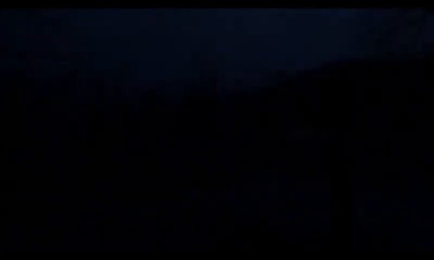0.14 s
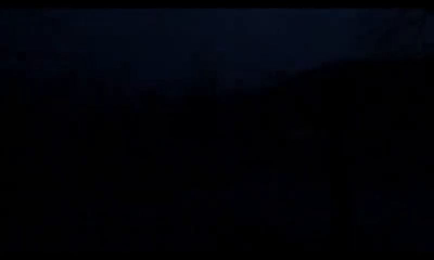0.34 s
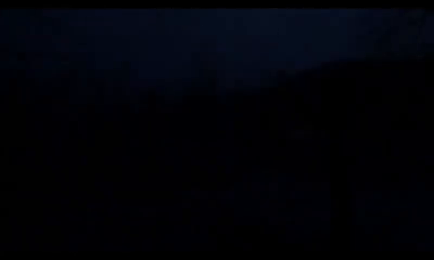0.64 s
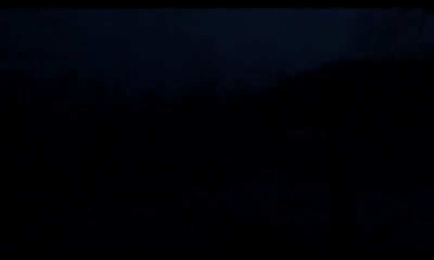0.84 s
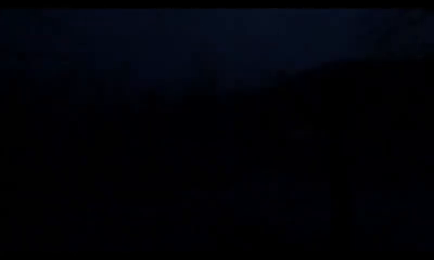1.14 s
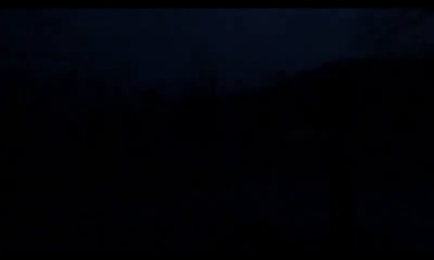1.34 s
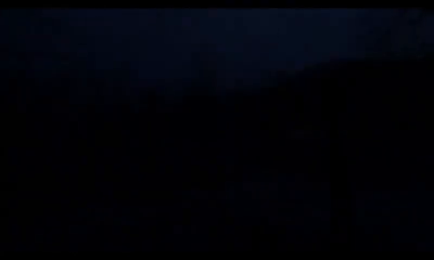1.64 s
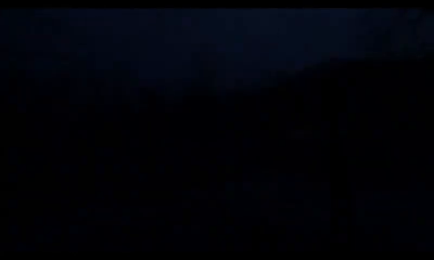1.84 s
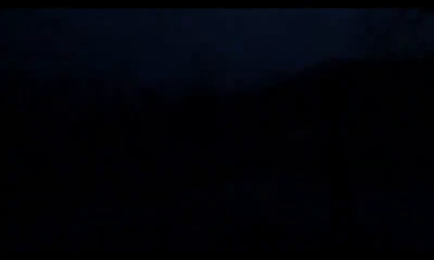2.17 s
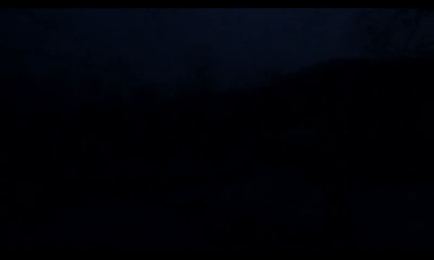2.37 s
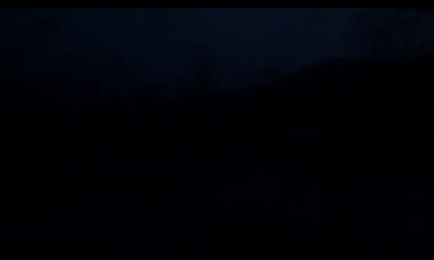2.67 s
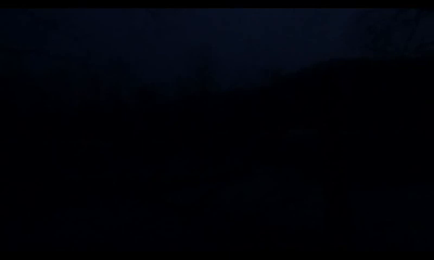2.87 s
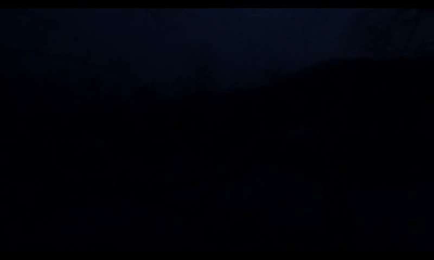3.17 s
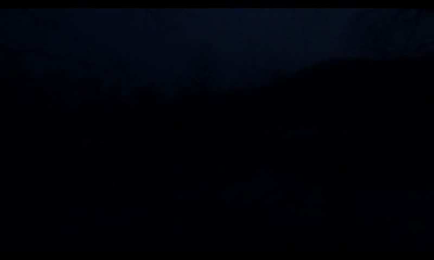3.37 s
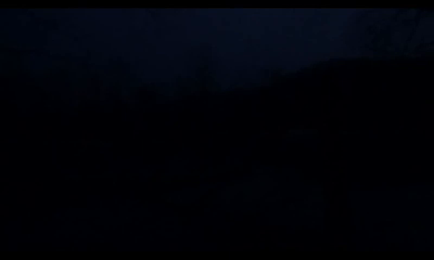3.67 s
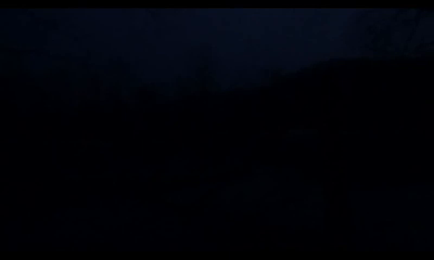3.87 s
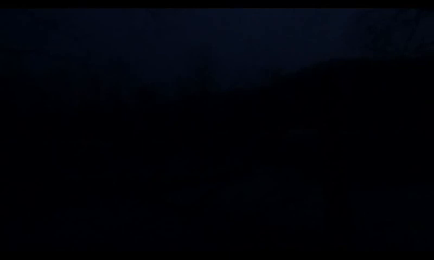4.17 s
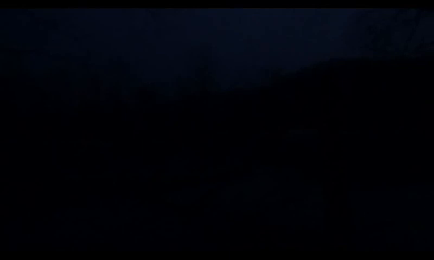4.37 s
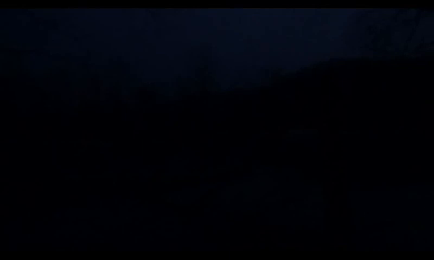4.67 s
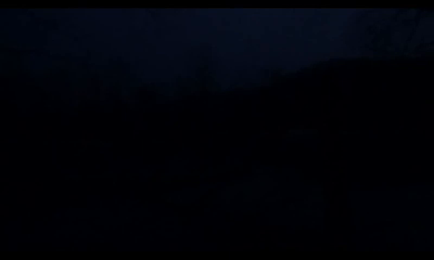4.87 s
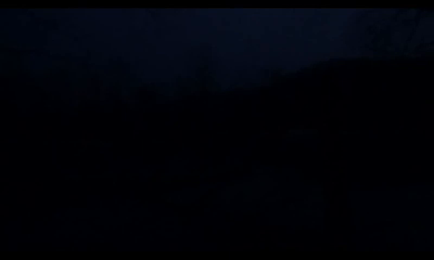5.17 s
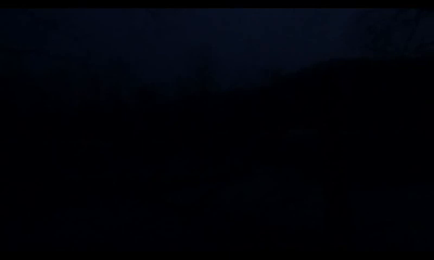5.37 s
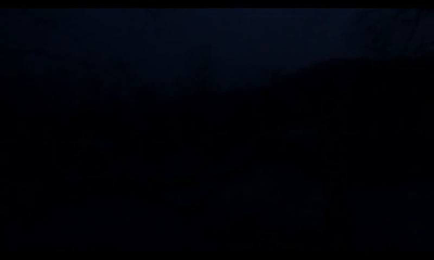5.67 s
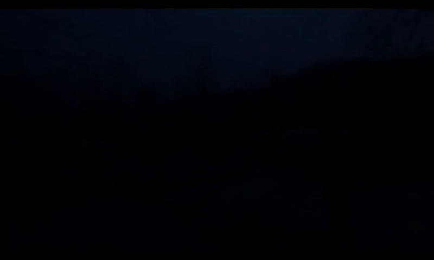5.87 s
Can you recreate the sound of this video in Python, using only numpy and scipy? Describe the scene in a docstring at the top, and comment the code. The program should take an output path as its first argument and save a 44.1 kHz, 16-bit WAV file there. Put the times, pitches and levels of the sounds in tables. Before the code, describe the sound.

In woods at dusk, an owl calls twice, close to the microphone and a little left. Each call is a rhythmic series of round, slightly breathy hoots, the second ending in a drawn-out falling note. A soft, steady stream dips beneath the hoots and comes back up afterward, while bubbles plop and twigs and dry leaves crackle faintly.

```python
"""Dusk woods: a steady stream rushes, a twig ticks. Close on the left comes an owl-like hoo, hoo, hoo-hoo,
the flute-like tone of a blown cavity: harder blowing lifts its pitch, overtones and air hiss together.
The trees return a faint tail. At 2.3 s the call comes again, and its last hoot slides away by 4 s.
The background level, sunk under the hoots, then recovers, like a recorder's gain control,
while single bubbles plop and twigs and dry leaves crackle."""
import sys
import numpy as np
from scipy import signal
from scipy.fft import rfft, irfft, next_fast_len
from scipy.io import wavfile
from scipy.ndimage import uniform_filter1d

SR = 44100
rng = np.random.default_rng(int(sys.argv[2]) if len(sys.argv) > 2 else 0)


def store_pcm(level_fs):
    """Save levels as 16-bit WAV."""
    pcm = np.round(np.clip(level_fs, -1, 1) * 32767).astype(np.int16)
    wavfile.write(sys.argv[1], SR, np.atleast_2d(pcm).T)


N = 265482
TIME = np.arange(N) / SR

# one push of air per hoot, slurred where they overlap: start_s, crest_s, end_s, crest_pitch_hz
PUSHES = [(.454, 0.554, .63, 609.4), (0.837, 0.91, 1.004, 632.6), (1.301, 1.375, 1.486, 611.6),
          (1.422, 1.579, 1.673, 640), (2.344, 2.435, 2.535, 630.8), (2.722, 2.785, 2.911, 651.2),
          (3.186, 3.259, 3.368, 629)]
# the long last hoot, sliding away as the air runs out: time_s, pitch_hz, level_db
LAST_HOOT = [(3.34, 570, -10), (3.39, 638.3, -10), (3.45, 654.2, -9.5), (3.512, 637.3, -9.5),
             (3.6, 611.9, -13), (3.692, 588, -11), (3.752, 568.1, -13), (3.848, 525.5, -19.5),
             (3.896, 464, -30), (3.916, 433, -41), (3.97, 364.5, -45.5), (4.03, 294.3, -59.5)]
# overtone colour at the reference blow: frequency_hz, relative_level_db
OVERTONES = [(900, -12), (1150, -39.5), (1240, -27.5), (1330, -36.5), (1650, -35.5), (1860, -26),
             (1990, -41.5), (2200, -42), (2500, -37), (2750, -44.5), (2900, -40), (3100, -45.5),
             (3400, -58), (3850, -40.5), (4180, -60.5), (4280, -40), (4400, -57.5), (5800, -47.5)]
# brief splits of the tone: centre_s, half_length_s, pitch_hz, relative_level_db, difference_db, sum_db
SPLITS = [(1.456, .028, 710.6, -19, -17.5, -27), (3.509, .035, 821, -33.5, -23, -2.5)]
# colour of the air hiss: frequency_hz, relative_level_db
HISS_COLOUR = [(30, -12), (140, -11.5), (300, -1.5), (520, 5.5), (780, 12.5), (1080, -7.5), (1600, 2.5),
               (2800, -6), (3500, -8), (5800, -8.5), (7500, -17.5), (8600, -7.5), (9900, -12), (11000, -23)]
# how alike the hiss is at both ears: frequency_hz, likeness (-1 to 1)
HISS_LIKENESS = [(60, 0.032), (600, 0.94), (1200, 0.81), (2300, 0.45), (5500, 0.14), (9000, .85)]
# upper resonances of the cavity: centre_hz, width_hz, relative_level_db
CAVITY_RINGS = [(1565, 84, -47.5), (2890, 180, -50.5), (4290, 11, -60.5), (5800, 260, -67),
                (8600, 300, -65)]
# where the hoot sits in stereo: frequency_hz, left_minus_right_db, left_lead_rad
HOOT_SIDE = [(100, -2.5, 0), (342.5, 6, 0), (624, 10.5, 0.22), (1250, 15.5, -1.15), (1711, 27.5, 4.3),
             (1874, 11, -2), (2340, 7.5, 2), (2455, 7, 1.45), (3020, 9, -1.9), (4240, 4.5, -2.5),
             (6500, -1.5, -1), (10810, -2.5, -1)]
# soft high notes leading into hoots and trailing the last: start_s, length_s, from_hz, to_hz, level_db
SOFT_NOTES = [(.373, .05, 576, 695, -21.5), (.806, 0.032, 545, 729, -26), (1.274, 0.028, 540, 750, -27),
              (2.288, 0.057, 550, 696, -27), (2.698, .031, 573, 733, -28.5),
              (3.142, 0.046, 562, 748, -28.5), (3.93, 0.095, 720, 601.5, -40.5),
              (4.01, 0.12, 615.5, 560, -26.5), (4.11, .05, 567.4, 494, -40),
              (4.16, 0.033, 585, 558.5, -44.5)]
# low murmurs under too little air: start_s, length_s, from_hz, to_hz, level_db
MURMURS = [(.402, .04, 338, 433, -36), (.428, 0.044, 415, 483.5, -25.5), (.626, 0.02, 424, 294, -45),
           (1.18, .09, 247, 225, -56)]
# slaps off near trunks: delay_s, level_db, left_minus_right_db
TRUNK_ECHOES = [(.021, -26, 6.5), (.058, -32, 9), (.094, -38.5, 1.5)]
# background level sinks under the hoots and recovers after them, like a recorder's gain control:
# time_s, level_db, tilt_db_per_octave
BACKGROUND_GAIN = [(0, -46, 1.5), (.35, -46, 0), (.75, -49, -1), (1.9, -56, 1), (2.349, -51.5, 0.5),
                   (3.051, -55, -.5), (4.402, -54.5, 0.3), (5.5, -50.5, 0.8), (6.02, -49.5, 0)]
# colour of the rushing water: frequency_hz, relative_level_db
STREAM_COLOUR = [(25, -7.5), (62, -9.5), (110, -11.5), (260, -9.5), (360, -8.5), (460, -0.5), (950, -0.5),
                 (1270, 0), (1800, -2.5), (2050, -6.5), (3000, -6), (5500, -12.5), (7200, -22), (8800, -9),
                 (11000, -20.5)]
# how alike the rush is at both ears: frequency_hz, likeness (-1 to 1)
STREAM_LIKENESS = [(60, 0.8), (170, 1), (490, 0.91), (1410, 0.82), (4060, 0.79), (11600, 0.51)]
# single plops in the stream: start_s, peak_db, pitch_hz
PLOPS = [(4.748, -44, 1690), (4.886, -44, 1380), (4.965, -46.5, 623), (5.022, -45.5, 610),
         (5.212, -44.5, 634), (5.241, -37.5, 1720)]
# dry ticks and a soft knock of twigs: start_s, relative_peak_db, centre_hz, t60_s
TWIG_TICKS = [(.061, -29.5, 496, 0.013), (0.364, -23, 2200, 0.0056), (0.456, -24.5, 1290, 0.034),
              (0.705, -33.5, 2700, 0.016), (1.206, -33, 1500, 0.048), (1.931, -41, 2000, 0.017),
              (2.066, -51, 6100, .02), (2.077, -32, 9650, 0.0054), (2.292, -35, 7100, 0.0081),
              (3.185, -43, 2974, .007), (4.146, -35, 8140, 0.0083), (4.245, -42, 2005, 0.017),
              (4.35, -41.5, 813, 0.045), (4.366, -46, 7150, 0.011), (4.811, -34, 9600, 0.009),
              (5.279, -34, 6200, 0.0098), (5.33, -38, 1300, 0.033), (5.692, -32.5, 1210, 0.05)]
# crunches of dry leaves: centre_s, spread_s, level_db, centre_hz
LEAF_CRUNCHES = [(3.853, 0.0091, -45, 1350), (4.264, 0.011, -49, 1304), (4.704, 0.015, -47.5, 1100),
                 (4.771, 0.016, -54, 1627), (5.161, 0.0086, -48.5, 1520), (5.183, 0.02, -55, 1245),
                 (5.705, 0.013, -47, 1100), (5.97, 0.0071, -55, 1200)]


def hoots(reference_hz=630, tone_side_db=9.5, purity=0.33):
    """A blown cavity's nearly pure tone; pitch follows the pressure, which drives overtones and hiss."""
    hz, level = blowing()
    blow_hz = np.minimum(hz - reference_hz, 40)
    phase = trembling_phase(hz, jitter=0.0045)
    left_only = np.array([[1], [0]])
    tone = np.sin(phase + left_only * at_hz(HOOT_SIDE, reference_hz, column=2))
    tone = tone * from_db(.18 * drift(35)) * sag(hz)   # the held tone wavers very slightly
    overtones = 0
    for k in range(2, 10):
        growth_db = 0.0136 * (k - 2.5) * blow_hz   # higher overtones grow faster with pressure
        strength = from_db(at_hz(OVERTONES, k * hz) + growth_db - 0.76 * drift(28))
        partial = np.sin(k * phase + left_only * at_hz(HOOT_SIDE, k * hz, column=2))
        overtones += strength * partial * pan(at_hz(HOOT_SIDE, k * hz))
    overtones *= (np.abs(level) / level.max()) ** purity   # a fading hoot turns pure
    voice = np.sqrt(2) * ((tone + split_tones(phase)) * pan(tone_side_db) + scattered(overtones))
    return level * (voice + air_hiss(phase, blow_hz) + cavity_rings(blow_hz))


def blowing(start_hz=485.3, end_hz=533, held_db=-10, attack_share=0.25, release_s=0.022):
    """Pitch and amplitude of the hoots: each push of air arches in pitch, and the strongest leads."""
    times, slide_hz, slide_db = np.transpose(LAST_HOOT)
    begun = TIME >= times[0]
    hz = uniform_filter1d(np.interp(TIME, times, slide_hz), int(.021 * SR)) * begun
    level = from_db(np.interp(TIME, times, slide_db)) * begun * (TIME <= times[-1])
    for start, crest, end, crest_hz in PUSHES:
        to_crest = np.maximum(crest - TIME, 0) / (crest - start)
        past_crest = np.maximum(TIME - crest, 0) / (end - crest)
        arch = crest_hz - (crest_hz - start_hz) * to_crest ** 2.15
        arch -= (crest_hz - end_hz) * past_crest ** 1.95
        droop_hz = 44.92 * np.exp(np.clip((TIME - end) / .007, -20, 2))   # the push runs out
        hz = np.maximum(hz, arch - droop_hz)
        opening = soft_step((1 - to_crest) / attack_share) * soft_step((end - TIME) / release_s)
        level = np.maximum(level, from_db(held_db) * opening)
    return uniform_filter1d([np.maximum(hz, slide_hz.min()), level], int(.003 * SR), axis=1)


def sag(hz, centre_hz=613, width_hz=7.9, depth_db=-3.5, fall_hz_per_s=700):
    """The level dips briefly as the pitch falls quickly through one narrow zone."""
    falling = np.clip(-np.gradient(hz) * SR / fall_hz_per_s, 0, 1)
    return from_db(depth_db * falling * np.exp(-np.square((hz - centre_hz) / width_hz)))


def split_tones(phase):
    """A second oscillation mixes with the main one into difference and sum tones."""
    out = 0
    for centre, half_s, hz, db, difference_db, sum_db in SPLITS:
        second = 2 * np.pi * hz * TIME
        difference = from_db(difference_db) * np.sin(second - phase)
        sums = from_db(sum_db) * sum(np.sin(second + k * phase) / k for k in range(1, 4))
        swell = np.exp(-((TIME - centre) / half_s) ** 4)
        out += from_db(db) * swell * (np.sin(second) + difference + sums)
    return out


def air_hiss(phase, blow_hz, level_db=-30, growth_db_per_hz=0.1064):
    """The breathy jet puffs once a cycle and grows with pressure."""
    bands = noise_bands(HISS_COLOUR, HISS_LIKENESS, flicker_db=2.35)
    hiss = sum(band * pan(at_hz(HOOT_SIDE, hz)) for hz, band in bands)
    return hiss * (1 + 0.17 * np.sin(phase)) * from_db(level_db + growth_db_per_hz * blow_hz)


def cavity_rings(blow_hz, gain_db=9, growth_db_per_hz=0.1449):
    """Air noise rings the cavity's upper resonances, louder under harder blowing."""
    out = 0
    for hz, width, db in CAVITY_RINGS:
        ring = resonance(resonance(rng.standard_normal(N), hz, width), hz, 4 * width)
        out += from_db(db) * rms_one(ring) * pan(at_hz(HOOT_SIDE, hz))
    return out * from_db(gain_db + growth_db_per_hz * blow_hz)


def soft_tones(notes, roundness, lead_db, lead_s, jitter, side_db):
    """At low pressure the cavity sings unsteady sines that creep in, then swell and fade on a glide."""
    out = 0
    for start, length, from_hz, to_hz, db in notes:
        along = np.clip((TIME - start) / length, 0, 1)
        swell = (4 * along * (1 - along)) ** roundness
        creep = from_db(lead_db) * np.exp(-np.clip((start - TIME) / lead_s, 0, 20)) * (1 - along)
        phase = trembling_phase(from_hz + (to_hz - from_hz) * along, jitter)
        out += from_db(db) * np.maximum(swell, creep) * np.sin(phase)
    return np.sqrt(2) * out * pan(side_db)


def scattered(x, wet_db=-8, decay_s=0.031):
    """Nearby surfaces add early reflections, so gliding overtones swell and fade."""
    age = TIME[:SR // 30]
    paths = rng.standard_normal((2, len(age))) * np.exp(-age / decay_s)
    paths /= np.linalg.norm(paths, axis=1, keepdims=True)
    return x + from_db(wet_db) * signal.fftconvolve(x, paths, axes=1)[:, :N]


def trunk_echoes(x):
    """The nearest trunks each throw the call back once."""
    mono = x.mean(axis=0)
    return sum(from_db(db) * pan(side_db) * np.interp(TIME - delay, TIME, mono, left=0)
               for delay, db, side_db in TRUNK_ECHOES)


def woods_tail(x, wet_db=-33, t60_s=1.3, lowpass_hz=1500, predelay_s=0.051):
    """Countless trunks scatter a faint, dull tail, different at each ear."""
    age = TIME[:2 * SR]
    echoes = rng.standard_normal((2, len(age))) * from_db(-60 * age / t60_s) * (age > predelay_s)
    echoes /= np.linalg.norm(echoes, axis=1, keepdims=True)
    dulled = signal.sosfilt(signal.butter(2, lowpass_hz, fs=SR, output="sos"), x.mean(axis=0))
    return from_db(wet_db) * signal.fftconvolve(dulled[None], echoes, axes=1)[:, :N]


def stream(rush_db=-1, gurgle_db=-8, spray_db=-12, pivot_hz=1500):
    """A steady bed of rushing water with gurgling bubbles and a fine crackle of spray."""
    times, db, tilt = np.transpose(BACKGROUND_GAIN)
    tilt = np.interp(TIME, times, tilt)
    bands = noise_bands(STREAM_COLOUR, STREAM_LIKENESS, flicker_db=2.5)
    rush = sum(band * from_db(tilt * np.log2(hz / pivot_hz)) for hz, band in bands)
    gurgle = bubbles(per_s=520, low_hz=590.4, high_hz=2352, sharpness=16, spread_db=3.5)
    spray = bubbles(per_s=430, low_hz=4860, high_hz=10600, sharpness=8.5, spread_db=5.5)
    water = from_db(rush_db) * rush + from_db(gurgle_db) * gurgle + from_db(spray_db) * spray
    return from_db(np.interp(TIME, times, db) + 1.2 * drift(12)) * water


def bubbles(per_s, low_hz, high_hz, sharpness, spread_db, pitches=22):
    """Bubbles of random size burst at random, each ringing a few cycles; rms 1."""
    out = 0
    for hz in np.geomspace(low_hz, high_hz, pitches):
        bursts = rng.random(N) < per_s / pitches / SR
        size = np.minimum(rng.exponential(1, N), 4)
        rings = resonance(bursts * from_db(spread_db * size), hz, hz / sharpness)
        out += rms_one(rings) * pan(rng.normal(0, 1.8))
    return rms_one(out)


def plops(ring_s=0.0093, rise_per_s=4.14):
    """Large bubbles ring briefly and rise in pitch as they surface."""
    out = 0
    for start, db, hz in PLOPS:
        age = np.clip(TIME - start, 0, 20 * ring_s)
        phase = 2 * np.pi * hz * age * (1 + rise_per_s * age / 2)
        out += from_db(db) * np.exp(-age / ring_s) * np.sin(phase)
    return out


def twig_ticks(trim_db=-1, sharpness=1.6):
    """Each twig gives a short burst of noise ringing in one broad resonance."""
    out, age = np.zeros(N), TIME[:SR // 4]
    for start, db, hz, t60 in TWIG_TICKS:
        burst = rng.standard_normal(len(age)) * from_db(-60 * age / t60)
        burst = resonance(resonance(burst, hz, hz / sharpness), hz, 3 * hz / sharpness)
        at = int(start * SR)
        out[at:at + len(age)] += (from_db(db + trim_db) * burst / np.abs(burst).max())[:N - at]
    return out


def leaf_crunches(snaps_per_s=550, sharpness=2.6):
    """Dry leaves crunch in clumps of tiny, uneven snaps."""
    out = 0
    for centre, spread_s, db, hz in LEAF_CRUNCHES:
        snaps = (rng.random(N) < snaps_per_s / SR) * rng.standard_normal(N)
        leaves = rms_one(resonance(resonance(snaps, hz, hz / sharpness), hz, hz))
        out += from_db(db) * np.exp(-np.square((TIME - centre) / spread_s) / 2) * leaves
    return out


def noise_bands(spectrum, likeness, flicker_db):
    """Coloured stereo noise of rms about 1, yielded as flickering half-octave bands: centre_hz, band."""
    edges = 28 * 2 ** (np.arange(19) / 2)
    size = next_fast_len(N)
    colour = from_db(at_hz(spectrum, np.maximum(np.fft.rfftfreq(size, 1 / SR), 1)))
    white = rng.standard_normal((2, 2, size))   # neighbouring bands use separate mid/side pairs
    noise = rms_one(irfft(rfft(white) * colour, size)[..., :N])
    for k, hz in enumerate(np.sqrt(edges[1:] * edges[:-1])):
        bandpass = signal.butter(2, edges[k:k + 2], "band", fs=SR, output="sos")
        mid, side = signal.sosfilt(bandpass, noise[k % 2])
        alike = np.clip(at_hz(likeness, hz), -.99, .99)
        band = np.sqrt((1 + alike) / 2) * mid + np.sqrt((1 - alike) / 2) * side * [[1], [-1]]
        yield hz, band * from_db(flicker_db * drift(30))


def trembling_phase(hz, jitter):
    """Phase of a tone whose pitch trembles in the turbulent air."""
    return 2 * np.pi * np.cumsum(hz * (1 + jitter * drift(98))) / SR


def drift(rate_hz, step=20, settle=4000):
    """Smooth random modulation of rms 1."""
    r = np.exp(-2 * np.pi * rate_hz * step / SR)
    slow = signal.lfilter([1], [1, -2 * r, r * r], rng.standard_normal(N // step + settle + 2))[settle:]
    return np.interp(np.arange(N) / step, np.arange(len(slow)), rms_one(slow))


def resonance(x, hz, width_hz):
    """Two-pole band-pass with unity gain at its peak."""
    r = np.exp(-np.pi * width_hz / SR)
    poles = [1, -2 * r * np.cos(2 * np.pi * hz / SR), r * r]
    return signal.lfilter(np.array([1, 0, -1]) * (1 - r * r) / 2, poles, x + 1e-18)


def soft_step(x, steepness=2.34):
    """An S-shaped fade from near 0 to near 1 as x goes from 0 to 1."""
    return (1 + np.tanh(steepness * (x - .5))) / 2


def pan(side_db):
    """Left and right gains whose mean is 1; positive leans left."""
    ratio = from_db(np.atleast_1d(side_db))
    return 2 * np.array([ratio, np.ones_like(ratio)]) / (1 + ratio)


def at_hz(points, hz, column=1):
    """Read a table on a log-frequency axis."""
    return np.interp(np.log(hz), np.log(np.array(points)[:, 0]), np.array(points)[:, column])


def from_db(db):
    """Decibels to gain."""
    return 10 ** (np.asarray(db) / 20)


def rms_one(x):
    """Scale to rms 1."""
    return x / np.sqrt(np.mean(x ** 2) + 1e-20)


def scene():
    """The call up front, its echoes behind it, then the water and the undergrowth."""
    soft = soft_tones(SOFT_NOTES, roundness=.9, lead_db=-14.5, lead_s=.021, jitter=.008, side_db=5)
    murmurs = soft_tones(MURMURS, roundness=.7, lead_db=-11.5, lead_s=.008, jitter=.029, side_db=2.5)
    call = hoots() + soft + murmurs
    return call + trunk_echoes(call) + woods_tail(call) + stream() + plops() + twig_ticks() + leaf_crunches()


def record(dry):
    """A steep high cut at 11 kHz."""
    return signal.sosfilt(signal.ellip(14, .1, 80, 11000, fs=SR, output="sos"), dry)


dry = scene()
out = record(dry)
store_pcm(out)
```